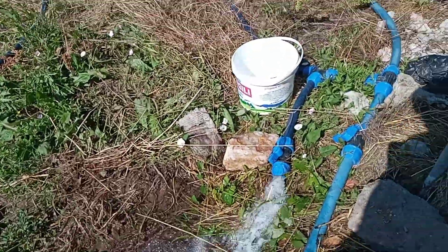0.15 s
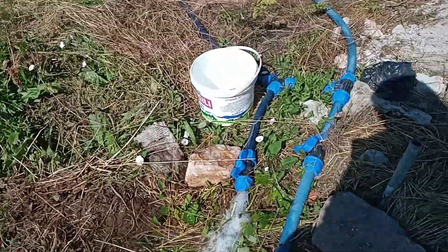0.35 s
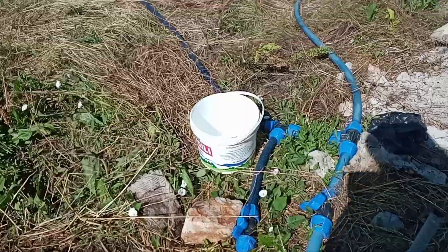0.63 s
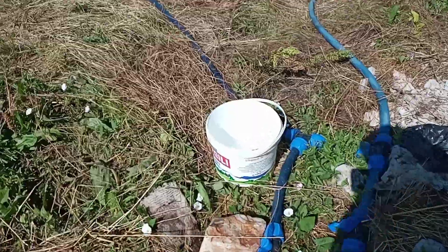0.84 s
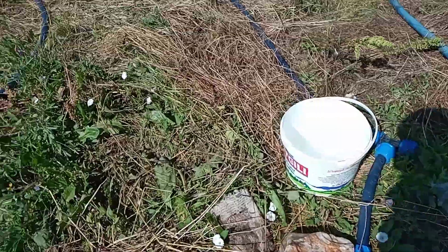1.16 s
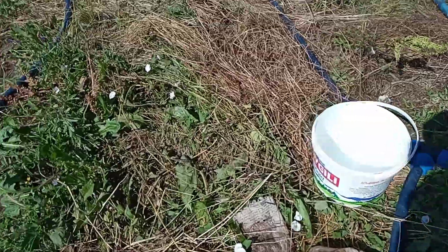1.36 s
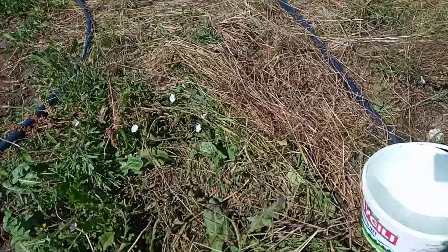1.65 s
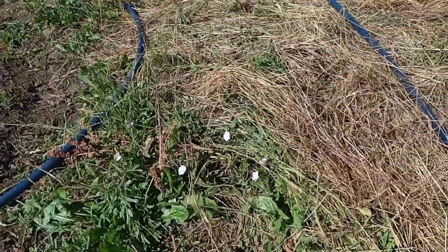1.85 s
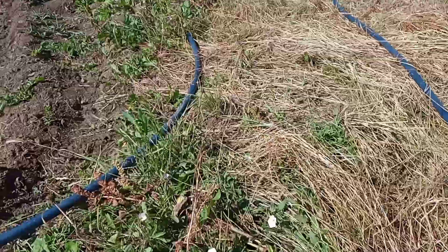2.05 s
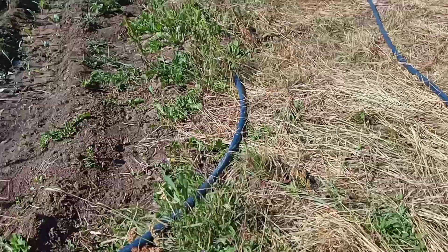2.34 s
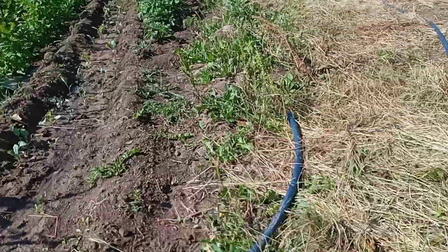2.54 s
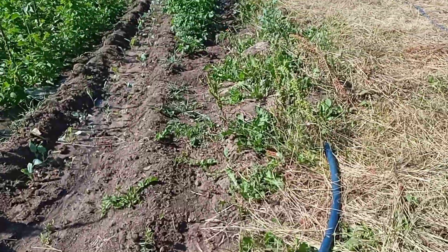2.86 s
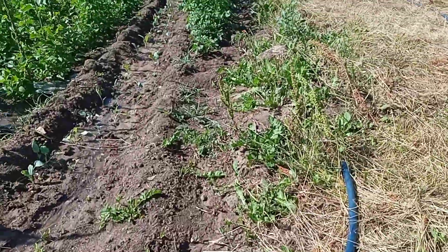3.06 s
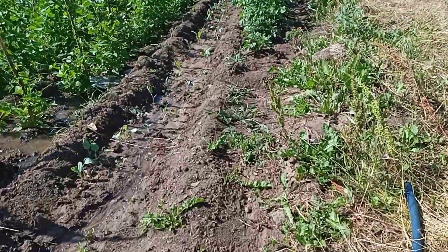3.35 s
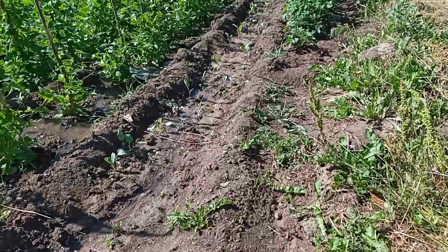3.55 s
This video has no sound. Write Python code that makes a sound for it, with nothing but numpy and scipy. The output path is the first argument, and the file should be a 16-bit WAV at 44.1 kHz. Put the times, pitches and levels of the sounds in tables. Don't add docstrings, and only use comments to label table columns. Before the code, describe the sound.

A bright splashing water jet rushes close by, turning dull and distant as footsteps brush grass.

```python
import sys
import numpy as np
from scipy import signal
from scipy.fft import rfft, irfft, next_fast_len
from scipy.io import wavfile
from scipy.ndimage import uniform_filter1d, map_coordinates

SR = 44100
rng = np.random.default_rng(int(sys.argv[2]) if len(sys.argv) > 2 else 0)


def output_pcm(signal):
    pcm = np.clip(np.atleast_2d(signal).T, -1, 1) * 32767
    wavfile.write(sys.argv[1], SR, np.round(pcm).astype(np.int16))


def convert_level_to_amplitude(level_db):
    exponent = np.asarray(level_db, float) / 20
    return 10 ** exponent


N = 163170

# (time [s], level [dB], treble shading [dB], ground echo delay [ms])
WALK_AWAY = [(0, -23, -2.5, 0.81), (.45, -22.5, -1, 0.82), (.9, -23, 1, 0.67), (1.4, -20.5, -0.5, 0.67),
             (1.7, -23, 1, 0.65), (1.9, -21, -17, 0.84), (2.02, -23.5, -6, 1.16), (2.27, -24.5, -13, 1.01),
             (2.33, -26.5, -14.5, 0.94), (2.55, -27.5, -16.5, 0.89), (2.8, -32, -16.5, 0.87),
             (3.05, -35.5, -27, 0.88), (3.3, -38.5, -31, 0.51), (3.5, -45, -13, 0.72),
             (3.7, -43, -28, 0.51)]
# (time [s], left over right [dB], bass edge [Hz])
CAMERA_TURN = [(0, -1, 877), (.4, -2, 896), (.9, 0, 865), (1.4, 0.5, 924), (1.75, 1, 800), (1.95, 5.5, 760),
               (2.22, 8, 620), (2.4, 7, 875), (2.62, 4.5, 770), (2.8, 3.5, 1040), (3.05, -2.5, 1290),
               (3.4, 6.5, 1370), (3.7, -6.5, 1190)]
# (time [s], lag of the left port [ms], focus [0-1])
PORT_LAG = [(0, .91, 1), (.55, .93, 1), (1.72, .71, 1), (1.95, .79, 1), (2.5, .79, 1), (2.9, .75, .75),
            (3.1, .8, .55), (3.25, .98, .5), (3.7, 1.3, .5)]
# (frequency [Hz], likeness [0-1])
JET_LIKENESS = [(500, .95), (1500, .93), (3000, .82), (6000, .62), (10000, .35)]
# (frequency [Hz], share of the direct sound [ratio])
GROUND_ECHO = [(1000, 0.13), (3000, 0.26), (5000, 0.062)]
# (frequency [Hz], share [0-1])
SHADING_SHARE = [(3440, 0), (7500, 0.58), (10500, 0.75), (12200, 1)]
# (time [s], peak level [dB], pitch [Hz])
PLOPS = [(.0588, -16, 2600), (0.1052, -16, 2750), (.2813, -16, 1740), (.3596, -14.5, 2700),
         (.5237, -15, 2500), (.5771, -19, 1140), (.6055, -17, 1880), (0.8624, -25, 2240),
         (.8964, -12, 3680), (1.0346, -13, 3680), (1.2197, -10.5, 3630), (1.2755, -16, 1590),
         (1.3598, -34, 2640), (1.8579, -19, 1410), (1.8935, -17.5, 2140), (2.082, -16, 1800),
         (2.245, -20.5, 940), (2.303, -16, 2900), (2.476, -19, 2490), (3.197, -39.5, 2770),
         (0.494, -12.5, 2290), (0.735, -17, 1120), (0.835, -9.5, 3480), (1.145, -18, 3670),
         (1.442, -17, 2960), (1.481, -18.5, 1550), (1.701, -20, 1410), (1.95, -13, 1560),
         (2.125, -16, 2040), (2.208, -15, 1300), (2.737, -17.5, 1460), (2.843, -22.5, 3060),
         (2.952, -31, 2380), (3.023, -25, 1680), (3.507, -22, 1670), (2.743, -20, 1560), (3.032, -31, 1830),
         (0.199, -17.5, 1110), (.98, -17, 1000)]
# (time [s], peak level [dB])
SPITS = [(0.1371, -8.5), (0.1805, -11), (0.4085, -13), (0.4509, -11), (0.5312, -12), (0.631, -18),
         (0.6664, -17), (0.7312, -26), (0.7886, -11), (0.8659, -23), (0.8929, -24), (1.1223, -19),
         (1.2226, -15), (1.283, -18), (1.3339, -15), (1.4012, -13), (1.4456, -19), (1.5858, -10),
         (1.6142, -11), (1.716, -17), (1.7559, -11), (1.9215, -21)]
# (time [s], length [s], level [dB], left over right [dB])
GULPS = [(.03, .03, -56, 3), (.213, 0.062, -49.5, -1), (.4, 0.093, -83, -7), (.585, 0.013, -54, 2),
         (.7, 0.14, -48.5, 5.5), (1.003, 0.026, -45.5, 7), (1.24, 0.14, -51.5, 6.5),
         (1.476, 0.11, -46, 7.5), (1.7, 0.08, -49.5, 10), (1.97, 0.051, -55.5, 9.5),
         (1.845, 0.045, -48.5, 12), (1.9, 0.013, -52, 15), (2.23, 0.026, -58, 7), (2.61, 0.031, -50.5, 2.5),
         (3.524, 0.075, -59.5, -8.5)]
# (frequency [Hz], level [dB])
GULP_COLOUR = [(250, -39), (400, -2), (550, 1.5), (900, -3), (1200, 16.5)]
# (time [s], level [dB])
TRICKLE = [
    (0, -48),
    (2.9, -59),
    (3.05, -49.5),
    (3.2, -60.5),
    (3.45, -48.5),
    (3.7, -47.5),
]
# (frequency [Hz], level [dB])
FURROW_COLOUR = [(1200, -19), (1500, -1.5), (1750, 4.5), (2050, 0.5), (2500, -25), (3400, 1), (4000, -11)]
# (time [s], rise [s], fall [s], level [dB])
STEPS = [
    (1.8, 0.11, 0.17, -32),
    (2.295, 0.017, .06, -36.5),
    (2.38, 0.051, 0.13, -39.5),
    (2.6, 0.041, 0.063, -41.5),
    (3.122, .004, 0.024, -46),
    (3.17, 0.023, 0.05, -46.5),
    (3.35, 0.12, 0.13, -39.5),
    (3.62, .05, 0.21, -53.5),
]
# (frequency [Hz], level [dB])
GRASS_COLOUR = [(1000, -5), (2000, -3.5), (4000, -5), (8000, 4), (16000, 4.5)]
# (time [s], peak level [dB], pitch [Hz])
SNAPS = [
    (2.7127, -33.5, 7050),
    (2.8284, -38, 4440),
    (2.9317, -38.5, 4800),
    (2.9544, -44, 4770),
    (3.1208, -42, 6560),
]
# (time [s], length [s], level [dB])
THUDS = [
    (0.475, 0.16, -77),
    (0.756, .03, -68),
    (1.017, 0.037, -71),
    (1.496, 0.053, -71),
    (1.76, 0.027, -62),
    (1.91, .02, -68),
    (1.849, 0.032, -60),
    (2.305, 0.062, -68),
    (3.124, 0.032, -66),
    (3.536, 0.052, -64.5),
]
# (frequency [Hz], level [dB])
THUD_COLOUR = [(30, -26), (70, 0), (150, -13.5), (300, -6.5), (500, -21)]
# (frequency [Hz], level [dB])
AIR_COLOUR = [(15, -61), (25, -6.5), (128, -5.5), (237, -5), (361, -3), (494, -4), (591, -2.5), (900, -11),
              (1170, -3), (1980, -120)]
# (frequency [Hz], level [dB])
INSECT_COLOUR = [(9000, -43), (9800, 4), (10300, 5), (10800, -3), (11500, -9)]
# (frequency [Hz], level [dB])
HISS_COLOUR = [(9000, -8), (13000, -6), (14200, 12), (16000, -6)]
# (frequency [Hz], level [dB])
LEFT_PORT = [(1100, -6), (2400, -1.5), (4700, -5), (6650, 1), (8200, -12.5)]
LEFT_PORT_TOP = [(13800, -34), (14200, -15), (15300, -12.5)]
# (frequency [Hz], level [dB])
RIGHT_PORT_LOW = [(600, -17.5)]
RIGHT_PORT = [(1100, -12), (4700, -12.5), (6600, -15), (8000, -25.5), (10300, -13.5), (13900, -31.5),
              (14300, -24), (15800, -13)]


def unit(x):
    return x / np.sqrt(np.mean(x ** 2) + 1e-20)


def along(points, hz):
    f, v = np.transpose(points)
    return np.interp(np.log(hz + 1), np.log(f + 1), v)


def follow(table, t):
    when, *columns = np.transpose(table)
    return [np.interp(t, when, column) for column in columns]


def wobble(rate):
    knots = rng.standard_normal(int(N * rate / SR) + 4)
    return map_coordinates(knots, [np.arange(N) * rate / SR])


def smeared(x, bins, frames):
    return uniform_filter1d(uniform_filter1d(x, size=bins, axis=-2), size=frames, axis=-1)


def delay(hz, ms):
    return np.exp(-2j * np.pi * hz * ms / 1000)


def filtered(x, response):
    m = next_fast_len(N + 8192)
    return irfft(rfft(x, m) * response(np.fft.rfftfreq(m, 1 / SR)), m)[..., :N]


def coloured(x, spectrum):
    closed = [(spectrum[0][0] / 3, -120)] + spectrum + [(spectrum[-1][0] * 2, -120)]
    return unit(filtered(x, lambda hz: convert_level_to_amplitude(along(closed, hz))))


def band_noise(spectrum):
    return coloured(rng.standard_normal((2, N)), spectrum)


def ring(start_s, hz, cycles, gain, rise, size):
    hz, cycles = [np.broadcast_to(v, start_s.shape)[:, None] for v in (hz, cycles)]
    t = np.arange(size) / SR
    u = t * hz / cycles
    envelope = u ** .5 * np.exp(-2.5 * u) * gain[:, None]
    wave = np.sin(2 * np.pi * hz * t * (1 + rise * u)) * envelope
    at = (start_s * SR).astype(int)[:, None] + np.arange(size)
    return np.bincount(at.ravel(), wave.ravel(), N + size)[:N]


def grains(low_hz, high_hz, cycles, spread_db, rise, count, size):
    r = rng.random((count, 4))
    hz = low_hz * (high_hz / low_hz) ** r[:, 1]
    rarity = np.minimum(-np.log(1 - r[:, 3]), 3.1)
    ringing = cycles * (0.57 + 1.16 * r[:, 2])
    x = ring(r[:, 0] * N / SR, hz, ringing, convert_level_to_amplitude(spread_db * rarity), rise, size)
    f, power = signal.welch(x, SR, nperseg=128)

    def flatten(g):
        band = (g > .7 * low_hz) / (1 + (g / high_hz) ** 4)
        return band / np.sqrt(np.interp(g, f, power))

    return unit(filtered(x, flatten))


def patchy(patchy_db):
    z = signal.stft(rng.standard_normal(N), nperseg=256)[2]
    patches = unit(smeared(rng.standard_normal(z.shape), bins=5, frames=8))
    return unit(signal.istft(z * convert_level_to_amplitude(patchy_db * patches), nperseg=256)[1][:N])


def distant(x, left_db, alike):
    late = filtered(x[0], lambda hz: delay(hz, 1.0))
    alike = np.clip(alike, 0, 1)
    right = alike * x[0] + np.sqrt(1 - alike ** 2) * x[1]
    return np.array([late * convert_level_to_amplitude(left_db / 2), right * convert_level_to_amplitude(-left_db / 2)])


def swells(events, sound, alike):
    t = np.arange(N) / SR
    swell = 0
    for s, length, db, left_db in events:
        side_db = np.array([[left_db], [-left_db]]) / 2
        swell = swell + convert_level_to_amplitude(db + 7 + side_db) * np.exp(-2 * ((t - s) / length) ** 2)
    return swell * distant(sound, 0, alike)


def ports(pair, right_db=0):
    def colour(hz):
        left = along(LEFT_PORT + LEFT_PORT_TOP, hz)
        return convert_level_to_amplitude([left, along(RIGHT_PORT_LOW + RIGHT_PORT, hz) + right_db])

    return filtered(pair, colour)


def jet():
    fizz = grains(681, 16880, cycles=2.5, spread_db=4, rise=0.069, count=14000, size=160)
    spatter = grains(1500, 10300, cycles=3.6, spread_db=3, rise=0, count=900, size=60)
    bubbles = grains(649, 7032, cycles=15.4, spread_db=4.0, rise=0.059, count=3500, size=560)
    glugs = grains(803, 1601, cycles=9.8, spread_db=3.5, rise=0.052, count=260, size=900)
    rush = patchy(patchy_db=-0.5)
    drops = convert_level_to_amplitude(-2) * fizz + convert_level_to_amplitude(-12.5) * spatter
    return unit(convert_level_to_amplitude(2.5) * rush + drops + convert_level_to_amplitude(-7) * bubbles + convert_level_to_amplitude(-12.5) * glugs)


def plops():
    when, peak_db, pitch_hz = np.transpose(PLOPS)
    bubbles = ring(when - .0005, pitch_hz, 5.9, convert_level_to_amplitude(peak_db + 14), rise=0.052, size=500)
    when, peak_db = np.transpose(SPITS)
    return bubbles + ring(when - .0003, 6550, 15, convert_level_to_amplitude(peak_db + 8), rise=0, size=120)


def bass_cut(hz, t, edge_hz):
    wander = wobble(21.99)[np.minimum((t * SR).astype(int), N - 1)]
    edge = edge_hz * np.exp(.07 * wander)
    steep_db = 65.5 * np.minimum(np.log2((hz + 1) / edge), 0)
    knee_db = 7.5 * np.minimum(np.log2((hz + 1) / (1.837 * edge)), 0)
    return steep_db + knee_db


def water():
    surge = convert_level_to_amplitude(.3 * wobble(7) + .5 * wobble(35) + 1.2 * wobble(80))
    level = convert_level_to_amplitude(follow(WALK_AWAY, np.arange(N) / SR)[0] + 7.5) * surge
    sources = [jet() * level + plops(), jet() * level]
    hz, t, (near, wide) = signal.stft(sources, SR, nperseg=1024, noverlap=896)
    hz = hz[:, None]
    _, shade_db, echo_ms = follow(WALK_AWAY, t)
    pan_db, edge_hz = follow(CAMERA_TURN, t)
    lag_ms, focus = follow(PORT_LAG, t)

    alike = along(JET_LIKENESS, hz) * focus
    right = (alike * near + np.sqrt(1 - alike ** 2) * wide) * convert_level_to_amplitude(-pan_db)
    pair = np.array([near * delay(hz, lag_ms), right])
    echo = [1 + along(GROUND_ECHO, hz) * delay(hz, echo_ms * longer) for longer in (1, 1.2)]
    shaded_db = along(SHADING_SHARE, hz) * shade_db * np.reshape([1, 1.07], (2, 1, 1))
    shimmer_db = 1.1 * unit(smeared(rng.standard_normal(pair.shape), bins=6, frames=70))
    pair = pair * echo * convert_level_to_amplitude(bass_cut(hz, t, edge_hz) + shaded_db + shimmer_db)
    return ports(signal.istft(pair, SR, nperseg=1024, noverlap=896)[1][:, :N])


def gulps():
    def wet():
        bubbles = grains(329, 1330, cycles=7, spread_db=3, rise=0.048, count=700, size=1100)
        return patchy(patchy_db=-5.5) + 0.78 * bubbles

    return swells(GULPS, coloured(np.array([wet(), wet()]), GULP_COLOUR), alike=0.94)


def trickle():
    def wet():
        bubbles = grains(1207, 4090, cycles=17, spread_db=1.0, rise=0.048, count=1500, size=700)
        return patchy(patchy_db=1.0) + 0.57 * bubbles

    colour = [(500, -100)] + FURROW_COLOUR + [(8000, -100)]
    pair = unit(filtered(np.array([wet(), wet()]), lambda hz: convert_level_to_amplitude(along(colour, hz))))
    level_db, = follow(TRICKLE, np.arange(N) / SR)
    return convert_level_to_amplitude(level_db) * distant(pair, left_db=14, alike=0.29)


def grass():
    def dry_stalks():
        crackle = grains(2000, 12400, cycles=0.86, spread_db=-5, rise=0, count=9000, size=80)
        return patchy(patchy_db=5.0) + 0.92 * crackle

    t = np.arange(N) / SR
    stroke = convert_level_to_amplitude(-74)
    for s, rise, fall, db in STEPS:
        stroke = stroke + convert_level_to_amplitude(db) * np.exp(-((t - s) / np.where(t < s, rise, fall)) ** 2)
    colour = [(400, -81)] + GRASS_COLOUR
    pair = np.array([dry_stalks(), dry_stalks()])
    pair = filtered(pair, lambda hz: convert_level_to_amplitude(along(colour, hz) + 6.5))
    return stroke * ports(pair, right_db=4)


def snaps():
    when, peak_db, pitch_hz = np.transpose(SNAPS)
    x = ring(when - .0003, pitch_hz, 10, convert_level_to_amplitude(peak_db + 13), rise=0, size=200)
    return distant(np.array([x, x]), left_db=20.5, alike=1)


def thuds():
    return swells([(*row, 6) for row in THUDS], band_noise(THUD_COLOUR), alike=.45)


def field():
    noise = rng.standard_normal((2, N))
    noise = unit(filtered(noise, lambda hz: convert_level_to_amplitude(along(AIR_COLOUR, hz))))
    left_db = 3.5 + 0.37 * follow(CAMERA_TURN, np.arange(N) / SR)[0]
    gusts_db = 0.75 * wobble(6.13) + 2.7 * wobble(22)
    return convert_level_to_amplitude(-60.5 + gusts_db) * distant(noise, left_db, alike=0.88)


def insects():
    shimmer = convert_level_to_amplitude(-72 + 3.4 * wobble(25.25))
    return shimmer * distant(band_noise(INSECT_COLOUR), left_db=-22.5, alike=0.15)


def hiss():
    return convert_level_to_amplitude(-72) * band_noise(HISS_COLOUR)


def scene():
    wet = water() + gulps() + trickle()
    walking = grass() + snaps() + thuds()
    return wet + walking + field() + insects() + hiss()


def suppressed(x):
    threshold_db, deepest_db = -108, -6
    z = signal.stft(x, SR, nperseg=1024, noverlap=768, scaling="psd")[2]
    power = np.abs(smeared(np.abs(z) ** 2, bins=5, frames=3))
    gain = power ** 2 / (power ** 2 + convert_level_to_amplitude(threshold_db) ** 4)
    gain = np.maximum(gain, convert_level_to_amplitude(deepest_db))
    return signal.istft(z * gain, SR, nperseg=1024, noverlap=768, scaling="psd")[1][:, :N]


def roll_off(x):
    return signal.sosfilt(signal.butter(12, 16000, fs=SR, output="sos"), x)


def record(dry):
    heard = filtered(suppressed(dry), lambda hz: (hz < 15850) / (1 + (54 / (hz + 1)) ** 3))
    return roll_off(heard)


dry = scene()
out = record(dry)
output_pcm(out)
```